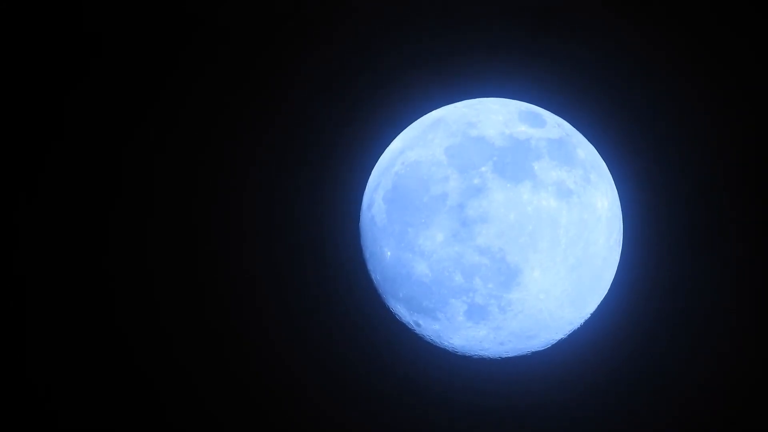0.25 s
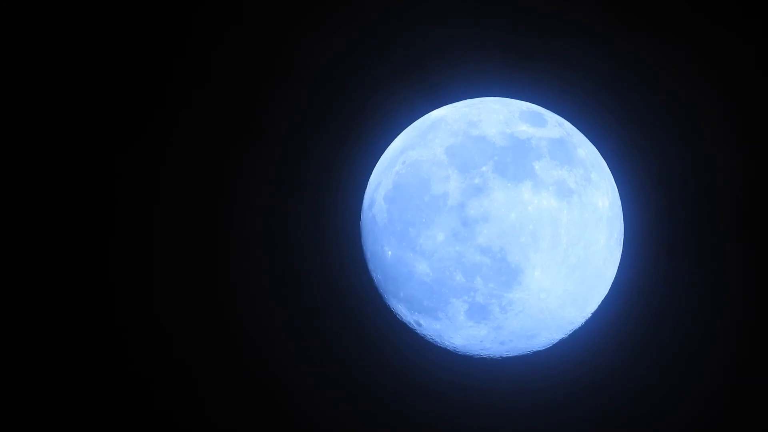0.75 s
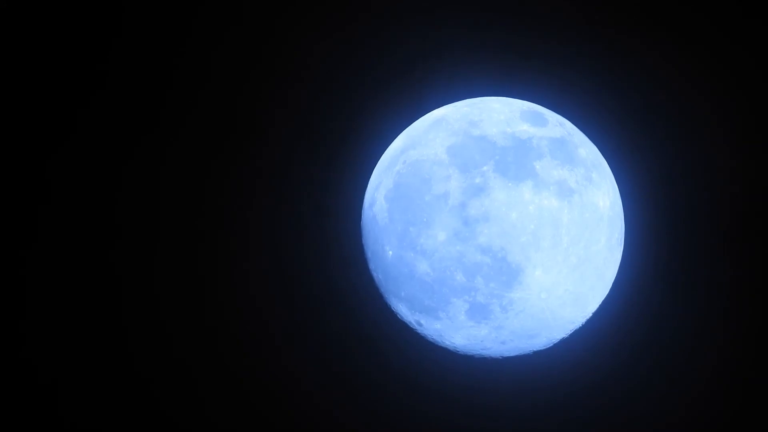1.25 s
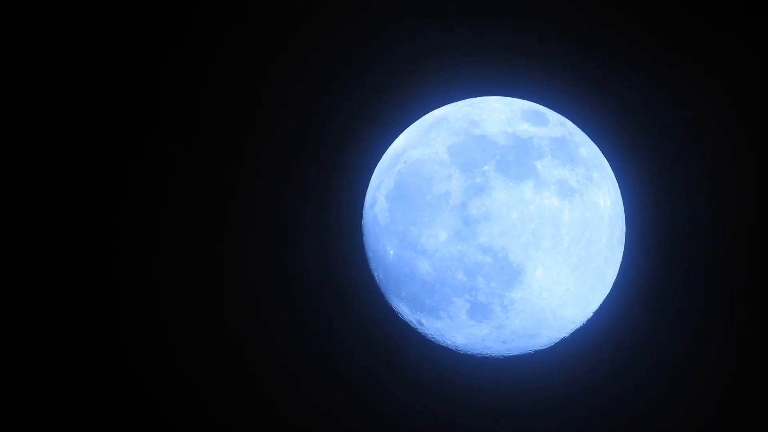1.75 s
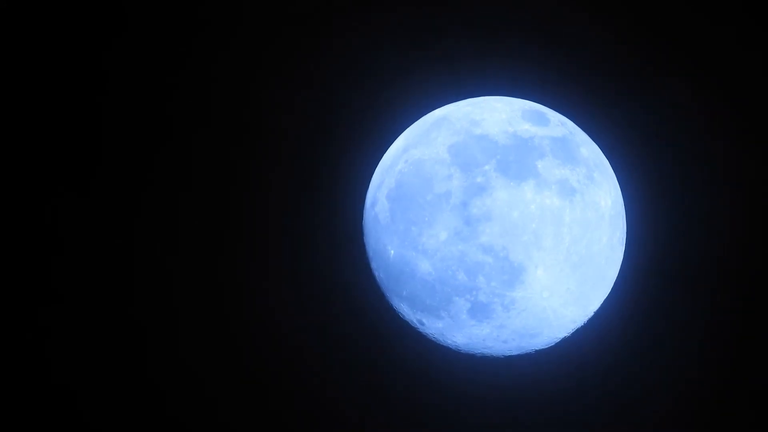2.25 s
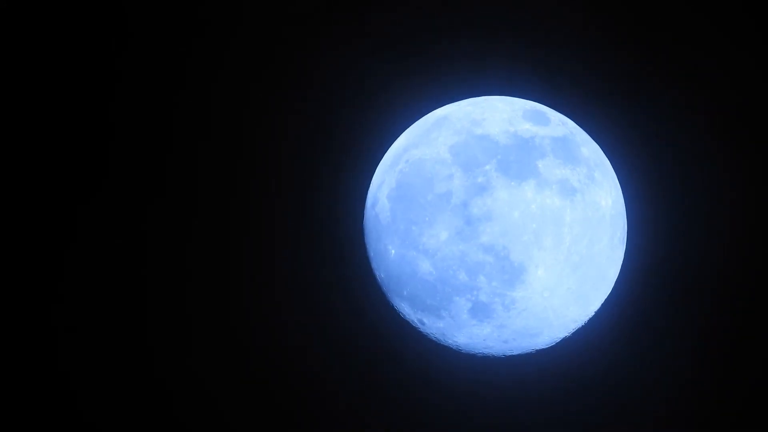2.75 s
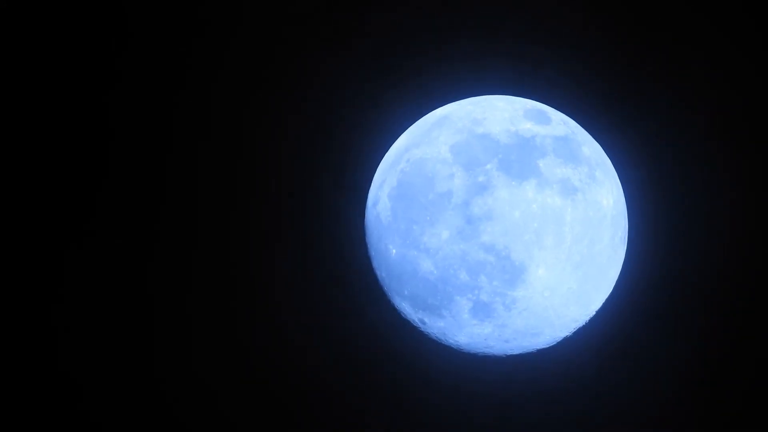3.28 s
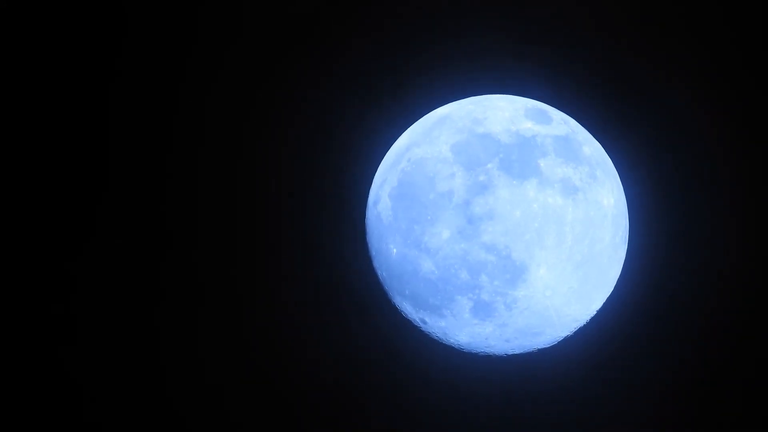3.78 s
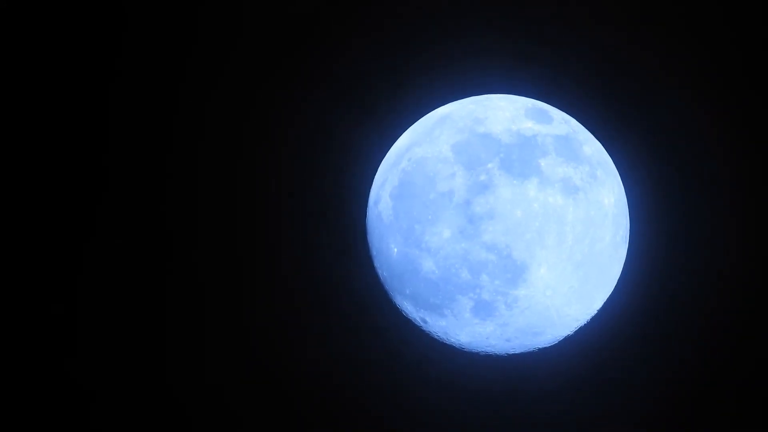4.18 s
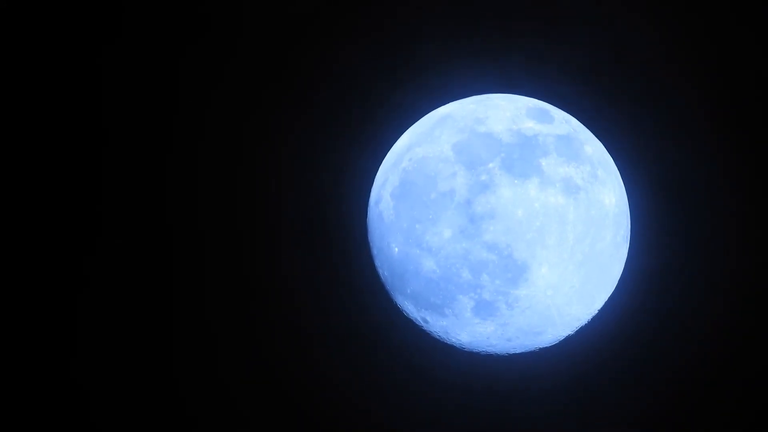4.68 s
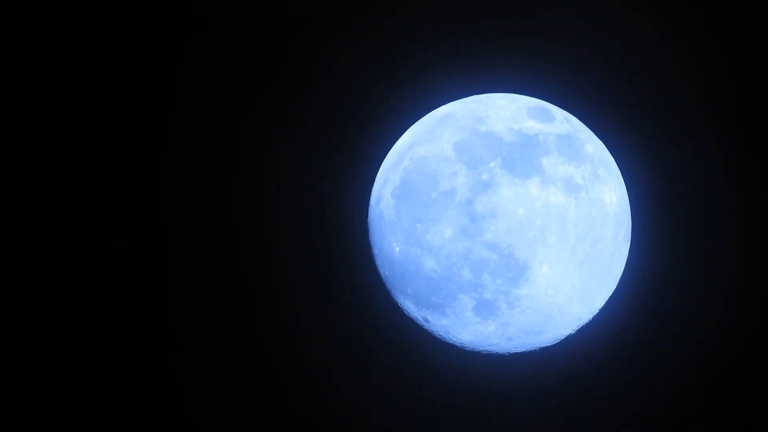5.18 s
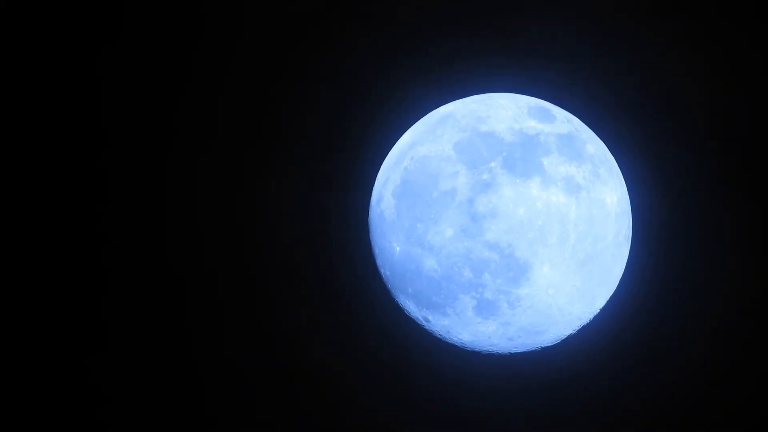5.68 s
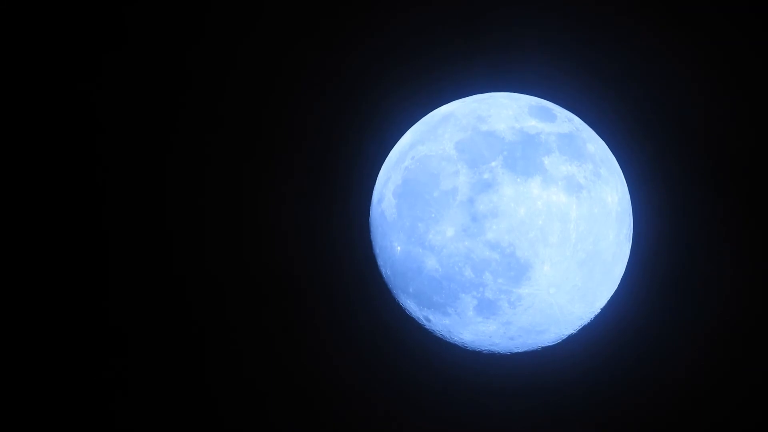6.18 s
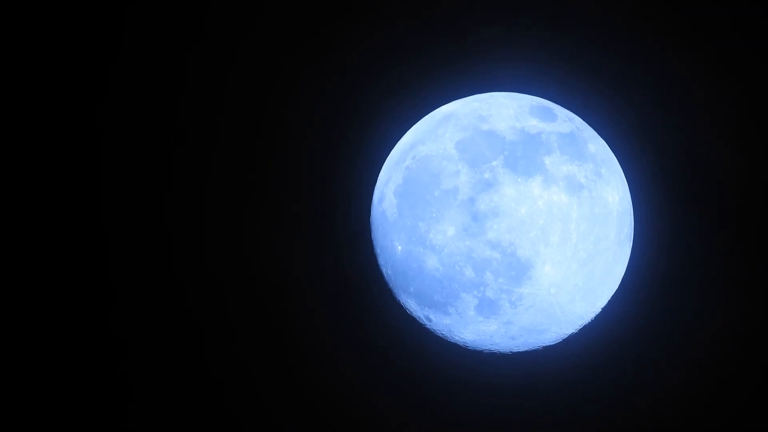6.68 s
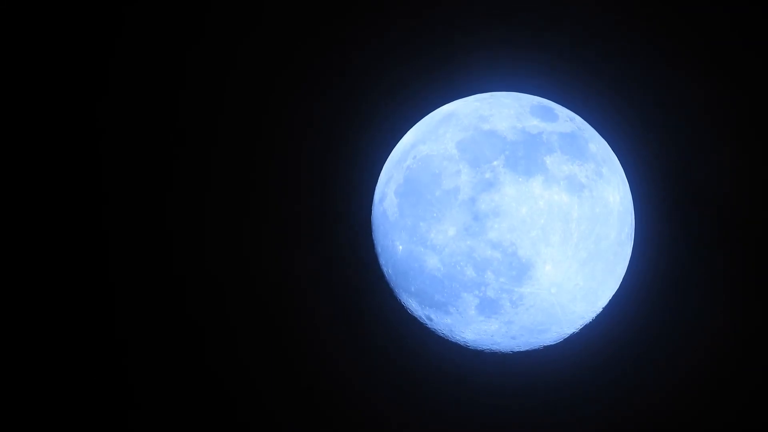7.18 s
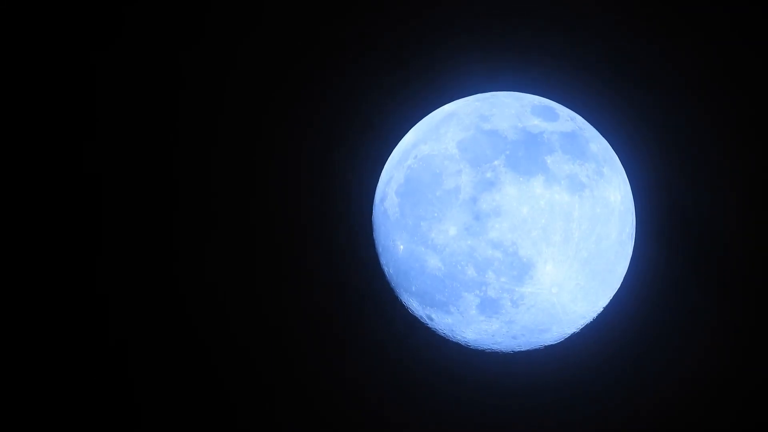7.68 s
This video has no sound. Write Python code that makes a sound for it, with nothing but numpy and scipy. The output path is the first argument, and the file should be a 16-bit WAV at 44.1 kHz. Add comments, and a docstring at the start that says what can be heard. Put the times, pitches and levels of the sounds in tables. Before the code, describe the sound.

A close tree cricket trills in short bouts at night over higher chirping crickets, buzzing insects and a faint hum of distant traffic.

```python
"""A meadow at night: close by, a tree cricket trills in short bouts by scraping its wings together.
Two small crickets pip higher up, and insects in the grass buzz above a far chorus.
Distant traffic murmurs underneath; the roar and hum of its tyres swell and die away."""
import sys
import numpy as np
from scipy import signal
from scipy.fft import next_fast_len
from scipy.io import wavfile
from scipy.ndimage import uniform_filter1d

SR = 44100
rng = np.random.default_rng(int(sys.argv[2]) if len(sys.argv) > 2 else 0)


def put_to_file(sound):
    """Save the sound as 16-bit audio at rate SR, in the file named by the first command-line argument."""
    columns = np.atleast_2d(sound).T  # one column per channel
    safe = np.clip(columns, -1, 1)
    whole_steps = np.round(safe * 32767)
    wavfile.write(sys.argv[1], SR, whole_steps.astype(np.int16))


N = 349713
TIME = np.arange(N) / SR


def gain_of(db):
    """Turns decibels into a number to multiply by."""
    return 10 ** (np.asarray(db) / 20)


def unit_level(x):
    """Scales a signal to an average size (rms) of one."""
    return x / np.sqrt(np.mean(abs(x) ** 2) + 1e-20)


def at_frequency(points, hz):
    """Looks up a table at the frequencies hz, on a log scale."""
    f, value = np.transpose(points)
    return np.interp(np.log(hz + 1), np.log(f + 1), value)


def at_time(rows, t=TIME):
    """Looks up each column of a table at the times t."""
    s, *columns = np.transpose(rows)
    return [np.interp(t, s, column) for column in columns]


def drift(width_hz):
    """A random wobble (complex noise) that changes about width_hz times a second."""
    size = next_fast_len(N)
    f = np.fft.fftfreq(size, 1 / SR)
    a, b = rng.standard_normal((2, size))
    spectrum = (a + 1j * b) * np.exp(-(f / width_hz) ** 2)
    return unit_level(np.fft.ifft(spectrum)[:N])


def tone(hz):
    """A pure (complex) tone that follows a pitch curve, given for every sample."""
    return np.exp(2j * np.pi * np.cumsum(hz) / SR)


def place(z, pan_db, lead):
    """Makes a sound stereo: the left side is pan_db louder and lead radians ahead."""
    side = gain_of(pan_db / 2) * np.exp(.5j * lead)
    return np.array([(z * side).real, (z / side).real])


def echoes(x, fade_s, rise_s):
    """Scattered bounces off leaves and ground, dying by 60 dB in fade_s."""
    t = np.arange(SR // 2) / SR
    taps = rng.standard_normal((2, len(t))) * (rng.random((2, len(t))) < 1 / 20)
    taps *= np.exp(-np.log(1000) * t / fade_s) * np.clip(t / rise_s, 0, 1) ** 2
    taps /= np.linalg.norm(taps, axis=1, keepdims=True)
    return signal.oaconvolve(x, taps, axes=1)[:, :N]


# how much louder the background is on the left: (frequency [Hz], left minus right [dB])
BALANCE = [(60, -1.5), (100, -2), (180, 0.5), (320, 2), (550, 4.5), (960, 7.5), (1670, 3), (2910, 1),
           (5060, -5.5), (8810, 0)]
# how alike its two sides are: (frequency [Hz], likeness [0-1])
LIKENESS = [(30, .78), (150, 1), (700, 0.76), (1300, 0.85), (2100, 0.12), (3500, 0.16), (6000, 0.11),
            (7500, 0.79), (8800, 0.9)]
# how far its left side is ahead: (frequency [Hz], phase [rad])
LEFT_LEAD = [(100, 0.19), (700, 0.33), (1400, 0.95), (2000, 0.29), (2600, 0), (8000, -0.79)]
def wash(spectrum, patchy_db):
    """Noise from all around, with drifting louder and softer patches."""
    frames, hz = N // 512 + 5, np.fft.rfftfreq(2048, 1 / SR)
    a, b, c, d, patches = rng.standard_normal((5, frames, len(hz)))
    patches = uniform_filter1d(patches, size=12, axis=0)  # smooth over time
    patches = unit_level(uniform_filter1d(patches, size=14, axis=1))  # and over frequency
    same = at_frequency(LIKENESS, hz)
    left = a + 1j * b
    right = same * left + np.sqrt(1 - same ** 2) * (c + 1j * d)
    right *= np.exp(-1j * at_frequency(LEFT_LEAD, hz))
    side = gain_of(at_frequency(BALANCE, hz) / 2)
    colour = gain_of(at_frequency(spectrum, hz) + patchy_db * patches)
    spectra = np.array([left * side, right / side]) * colour
    _, noise = signal.istft(spectra.swapaxes(1, 2), nperseg=2048, noverlap=1536)
    return unit_level(noise[:, :N])


# murmur of far roads: (frequency [Hz], relative level [dB])
MURMUR_SPECTRUM = [(25, -39.5), (60, -44.5), (100, -24), (140, -25.5), (200, -1.5), (300, 0), (520, -2),
                   (720, -1), (950, -1.5), (1130, -7), (1330, -10), (1600, -13.5), (2300, -20.5),
                   (4000, -43)]
# roar of passing tyres: (frequency [Hz], relative level [dB])
ROAR_SPECTRUM = [(150, -47.5), (250, -10.5), (550, -11.5), (680, 2.5), (830, -0.5), (960, -1.5),
                 (1100, -10.5), (1330, -10.5), (1600, -24), (2300, -37)]
# how the roar swells: (time [s], level [dB])
ROAR_LEVEL = [(0, -54.5), (1, -49), (2, -49), (2.6, -60.5), (3.5, -55.5), (4.4, -58), (5, -48.5),
              (6.4, -50), (7.1, -47), (7.93, -50)]
def far_roads():
    """A steady murmur of traffic, with tyre roar that comes and goes."""
    murmur = gain_of(-50) * wash(MURMUR_SPECTRUM, patchy_db=1.45)
    roar = gain_of(at_time(ROAR_LEVEL)[0]) * wash(ROAR_SPECTRUM, patchy_db=2.5)
    return murmur + roar


def wavering_tones(rows):
    """Bands of noise so narrow that they sound like unsteady notes."""
    return sum(gain_of(db) * drift(width_hz=width) * tone(np.full(N, hz)) for hz, width, db in rows)


# low hum and higher whine of the first vehicle's tyres: (pitch [Hz], width [Hz], relative level [dB])
FIRST_HUM = [(322.5, 3.5, 2.5), (337.7, 3.5, 1), (349.7, 2.5, 1), (355, 3.5, 2.5)]
FIRST_WHINE = [(649, 18, -6), (674, 9.1, 1), (742, 21, -3.5)]
# how they swell and fade: (time [s], hum gain [dB], whine gain [dB])
FIRST_LEVEL = [(0, -65, -70), (.7, -62, -53), (1.4, -61.5, -55.5), (1.9, -54, -56), (2.55, -61.5, -56),
               (3.4, -60, -86), (4, -70.5, -92), (4.5, -86, -93)]
def first_vehicle():
    """Tyre treads sing on the road to the left and fade about halfway through."""
    hum_db, whine_db = at_time(FIRST_LEVEL)
    hum = gain_of(hum_db) * wavering_tones(FIRST_HUM)
    whine = gain_of(whine_db) * wavering_tones(FIRST_WHINE)
    return place(hum + whine, pan_db=10.5, lead=.2)


# the second vehicle's tyres: (time [s], tread rate [Hz], hum level [dB], octave level [dB])
SECOND_HUM = [(0, 334, -103, -91.5), (4, 340, -85.5, -69.5), (4.6, 336.6, -62.5, -56),
              (5.1, 335.5, -57, -56), (5.6, 335, -53, -50), (6.2, 335.3, -61, -57),
              (6.6, 333.8, -57.5, -55.5), (7, 335.4, -50.5, -53), (7.5, 335.5, -47.5, -54.5),
              (7.93, 333, -56.5, -54.5)]
def second_vehicle():
    """Later, more tyres hum on the left, pitched at the rate their tread hits the road."""
    hz, hum_db, octave_db = at_time(SECOND_HUM)
    hum = gain_of(hum_db) * tone(hz) * (1 + .44 * drift(width_hz=19))
    octave = gain_of(octave_db) * tone(2 * hz) * (1 + .57 * drift(width_hz=15))
    whine = gain_of(hum_db - 13) * tone(4 * hz) * drift(width_hz=40)
    return place(hum + octave + whine, pan_db=10.5, lead=.2)


# far insects: (frequency [Hz], relative level [dB])
CHORUS_SPECTRUM = [(2000, -42), (2400, -21), (2750, -14.5), (3020, -10), (3350, -22.5), (3900, -28),
                   (4300, -21), (4700, -10), (5250, -5), (5900, -13.5), (6500, -4.5), (7300, -3.5),
                   (8000, -12), (8900, -29)]
def far_chorus():
    """Many distant insects blur into one high hiss."""
    return gain_of(-51.5) * wash(CHORUS_SPECTRUM, patchy_db=1.95)


def buzz(level, rate_hz, pitch_hz, fall_hz, rasp_hz, duty, rasp):
    """Fast, falling wing strokes; duty is the share of time sounding, rasp the share of noise."""
    rate = rate_hz * (1 + .006 * drift(width_hz=3).real)
    number, cycle = np.divmod(np.cumsum(rate) / SR, 1)
    swell = np.sin(np.pi * np.minimum(cycle / duty, 1))
    fresh = np.exp(2j * np.pi * rng.random(N))[number.astype(int)]  # each stroke starts the wing afresh
    grain = np.sqrt(1 - rasp) * fresh + np.sqrt(rasp) * drift(width_hz=rasp_hz)
    glide = tone(pitch_hz - fall_hz * (cycle / duty - .5))
    return np.sqrt(2) * gain_of(at_time(level)[0]) * unit_level(swell * grain * glide)


# loudness of three buzzing insects: (time [s], relative level [dB])
LOW_BUZZ = [(0, -64.5), (2.3, -62), (3, -60), (4.4, -58), (5, -59), (6, -58.5), (7.9, -58.5)]
STEADY_BUZZ = [(0, -60.5), (1, -59), (2.3, -61), (3.9, -57), (4.6, -57.5), (5.2, -60.5), (6, -57.5),
               (7.4, -63.5), (7.9, -61)]
FITFUL_BUZZ = [(0, -71), (.8, -60), (1.8, -56), (2.3, -62.5), (2.6, -72), (4.1, -59.5), (4.8, -63),
               (6.05, -74), (6.3, -58), (7.6, -57), (7.9, -74.5)]
def meadow_insects():
    """One lower buzzer deep in the grass and two high ones in the open."""
    low = buzz(LOW_BUZZ, rate_hz=62.3, pitch_hz=5255, fall_hz=99.8, rasp_hz=260, duty=.5, rasp=.44)
    steady = buzz(STEADY_BUZZ, rate_hz=98.6, pitch_hz=7646, fall_hz=798, rasp_hz=460, duty=.8, rasp=.35)
    fitful = buzz(FITFUL_BUZZ, rate_hz=106.6, pitch_hz=7770, fall_hz=847, rasp_hz=460, duty=.7, rasp=.17)
    low = place(low, pan_db=-2, lead=-.33)
    high = place(steady + fitful, pan_db=-.8, lead=-.58)
    low_echo = gain_of(-7.5) * echoes(low, fade_s=.18, rise_s=.0016)
    high_echo = gain_of(-9.5) * echoes(high, fade_s=.21, rise_s=.0026)
    return gain_of(-2.5) * low + high + low_echo + high_echo


def wing_strokes(times, levels_db, shape, uneven_db, detune):
    """Each wing stroke is a short sliding tone, a little different from the last."""
    song = np.zeros(N, complex)
    for s, db, (loud, sharp) in zip(times, levels_db, rng.standard_normal((len(times), 2))):
        start, end = int((s + shape[0][0]) * SR), int((s + shape[-1][0]) * SR)
        at = np.arange(max(start, 0), min(end, N))
        size, hz = at_time(shape, at / SR - s)
        song[at] += gain_of(db + uneven_db * loud) * size * tone(hz * (1 + detune * sharp))
    return song


# one pip of the wings: (time [s], strength [0-1], pitch [Hz])
PIP_STROKE = [(-.015, 0, 7140), (-.011, .85, 7112), (0, .75, 7092), (.008, 1, 7072), (.011, .7, 7045),
              (.013, 0, 7010)]
# how fast the pips come: (time [s], rate [strokes/s])
PIP_TEMPO = [(0, 9.809), (1.2, 9.75), (1.7, 9.178), (3.4, 9.732), (5.3, 9.506), (5.8, 9.843), (6.7, 9.617)]
# how loud they are: (time [s], relative level [dB])
PIP_LEVEL = [(0, -51), (.4, -48), (1.1, -54), (1.7, -50), (2.8, -50.5), (3.6, -55.5), (4.5, -53),
             (5.8, -50), (6.3, -54), (7.3, -49.5), (7.93, -50)]
def pip_cricket():
    """Single wing strokes from the right, about ten a second."""
    rate = at_time(PIP_TEMPO)[0] * (TIME >= .076)  # wait for the first pip
    beats = np.cumsum(rate) / SR
    times = TIME[np.flatnonzero(np.diff(np.ceil(beats)))]  # one pip at each new beat
    song = wing_strokes(times, at_time(PIP_LEVEL, times)[0], PIP_STROKE, uneven_db=1.4, detune=.00091)
    song *= 1 + .43 * drift(width_hz=200)
    direct = place(song, pan_db=-8.5, lead=.56)
    return direct + gain_of(-2.5) * echoes(direct, fade_s=.19, rise_s=.0044)


# runs of double chirps: (first chirp [s], last chirp [s], relative level [dB])
DOUBLE_BOUTS = [(-.009, 3.636, -43.5), (4.277, 7.058, -42.5), (7.826, 7.999, -44)]
# one wing stroke of a chirp: (time [s], strength [0-1], pitch [Hz])
DOUBLE_STROKE = [(-.015, 0, 6410), (-.009, .6, 6448), (0, .95, 6425), (.006, 1, 6355), (.011, .7, 6275),
                 (.015, 0, 6170)]
def double_cricket():
    """Two falling wing strokes to a chirp, nearly six chirps a second."""
    chirp_every_s, second_stroke_s = .1737, .044
    song = np.zeros(N, complex)
    for first, last, db in DOUBLE_BOUTS:
        chirps = np.linspace(first, last, round((last - first) / chirp_every_s) + 1)
        times = np.concatenate([chirps, chirps + second_stroke_s])
        song += wing_strokes(times, np.full(len(times), db), DOUBLE_STROKE, uneven_db=.3, detune=.0019)
    song *= 1 + .22 * drift(width_hz=140)
    direct = place(song, pan_db=2.5, lead=-1.2)
    return gain_of(-5) * direct + gain_of(-10.5) * echoes(direct, fade_s=.21, rise_s=.0063)


# the tree cricket's trills: (first stroke [s], last stroke [s])
TRILLS = [(-.0146, .0273), (.1563, .4889), (.6291, .9412), (1.1104, 1.5067), (1.6156, 1.9493),
          (2.0551, 2.326), (2.4304, 2.7213), (2.8628, 3.1537), (3.2609, 3.6565), (3.8328, 4.3126),
          (4.582, 4.602), (4.6432, 4.9345), (5.0671, 5.3581), (5.5226, 6.0229), (6.1874, 6.4354),
          (6.5808, 6.8287), (6.9638, 7.3379), (7.464, 7.6294), (7.8776, 7.9184)]
# one closing of the wings, which slow down and then ring out: (time [s], strength [0-1], pitch [Hz])
TRILL_STROKE = [(-.0074, 0, 2720), (-.0056, .46, 2695), (-.0035, .83, 2665), (-.0017, 1, 2642),
                (.001, .95, 2582), (.0035, .75, 2547), (.005, .6, 2570), (.0063, .33, 2525),
                (.008, .14, 2492), (.0105, 0, 2440)]
def tree_cricket():
    """One wing scrapes a row of teeth on the other; each trill starts softly and slows a little."""
    strokes_per_s, slowing = 48.1, .017
    level_db, soft_start_db = -35.1, -1.2
    waver_s = .00016 * drift(width_hz=8).real
    song = np.zeros(N, complex)
    for first, last in TRILLS:
        progress = np.linspace(0, 1, round((last - first) * strokes_per_s) + 1)
        times = first + (last - first) * (progress - slowing * progress * (1 - progress))
        times += np.interp(times, TIME, waver_s)
        levels_db = level_db + soft_start_db * (progress == 0)
        song += wing_strokes(times, levels_db, TRILL_STROKE, uneven_db=.3, detune=.0015)
    song *= 1 + .016 * drift(width_hz=540)  # the teeth are uneven
    direct = place(song, pan_db=1, lead=.01)
    return direct + gain_of(-16.5) * echoes(direct, fade_s=.34, rise_s=.008)


def scene():
    """Insects far and near over the distant traffic."""
    insects = far_chorus() + tree_cricket() + double_cricket() + pip_cricket() + meadow_insects()
    return insects + far_roads() + first_vehicle() + second_vehicle()


def record(dry):
    """The recorder cuts off the highest treble steeply."""
    low_pass = signal.firwin(1023, cutoff=8960, window=("kaiser", 9), fs=SR)
    return signal.oaconvolve(dry, low_pass[None], "same", axes=1)


dry = scene()
out = record(dry)
put_to_file(out)
```